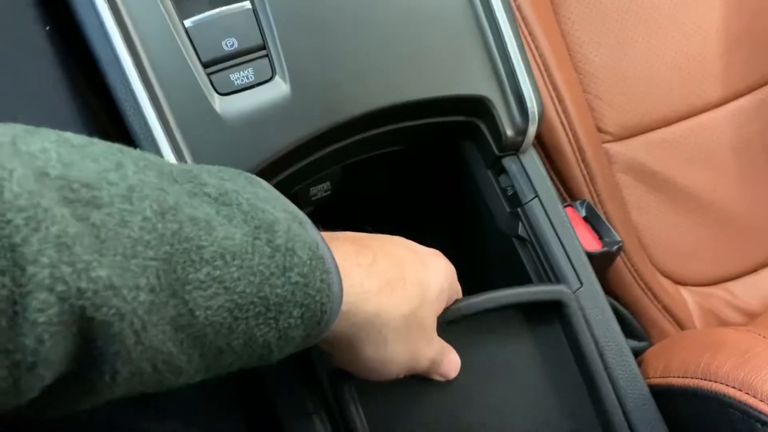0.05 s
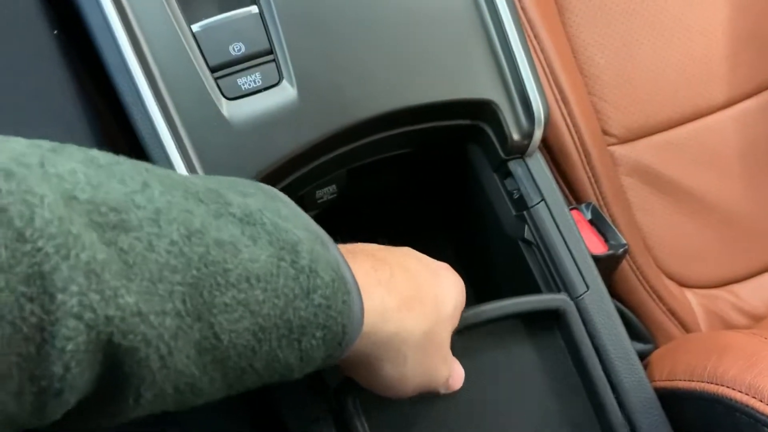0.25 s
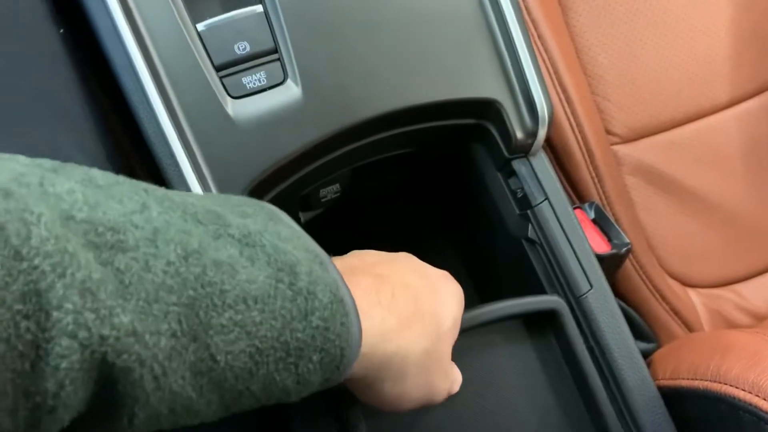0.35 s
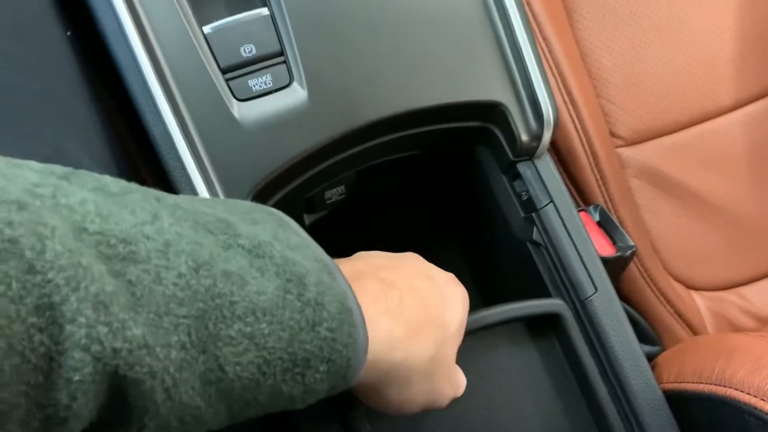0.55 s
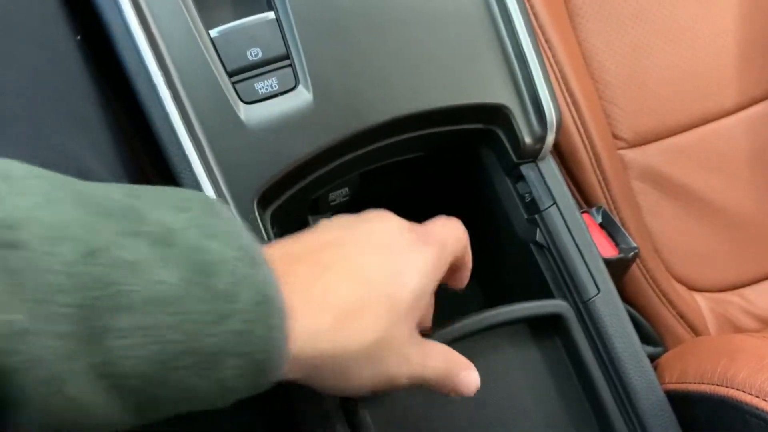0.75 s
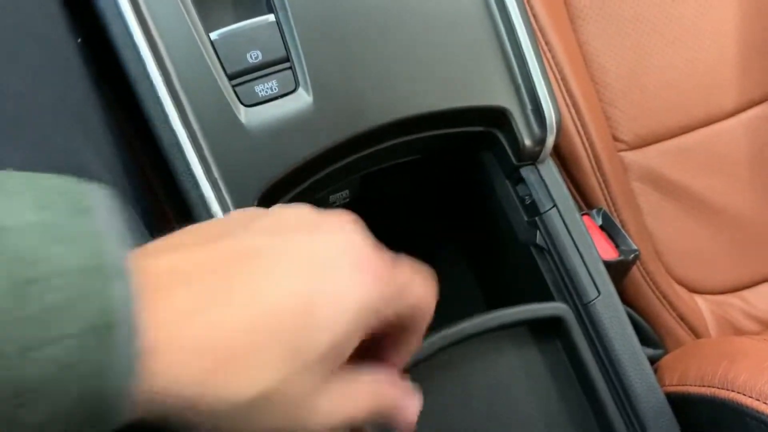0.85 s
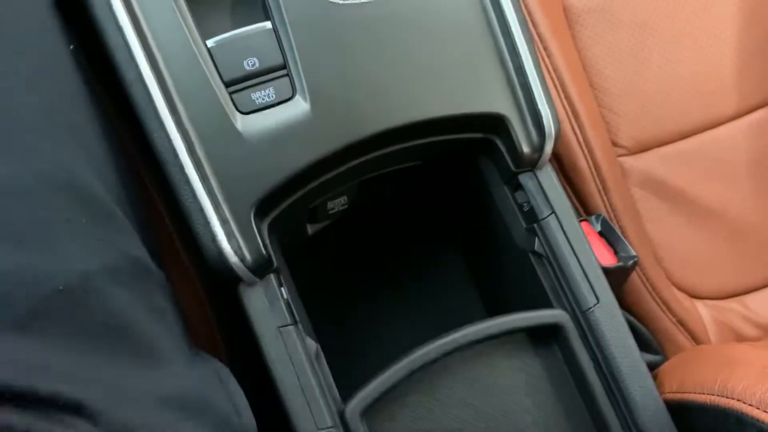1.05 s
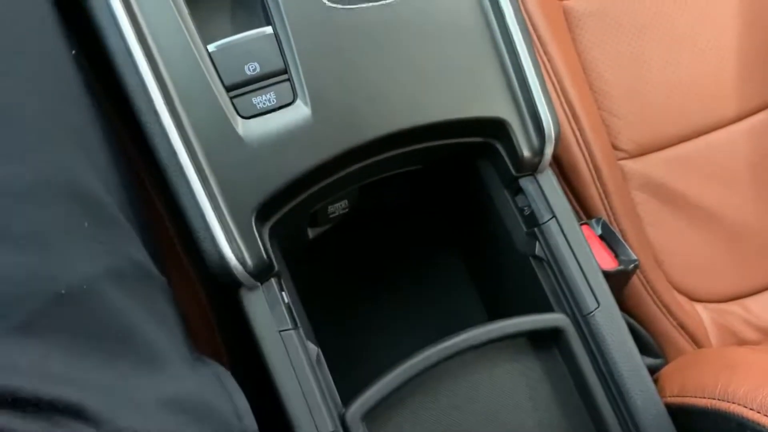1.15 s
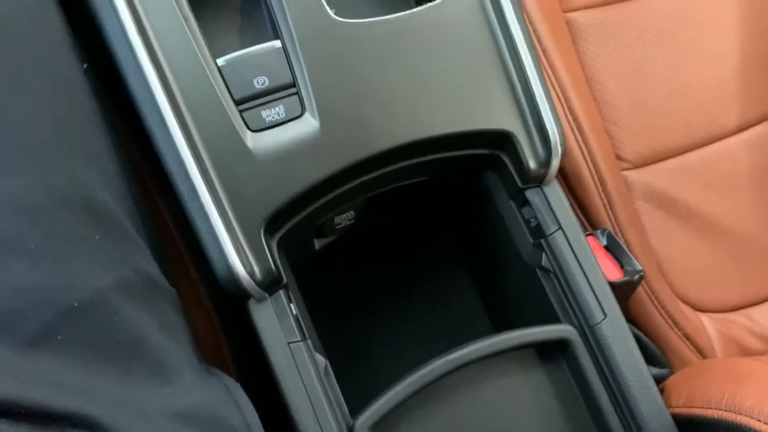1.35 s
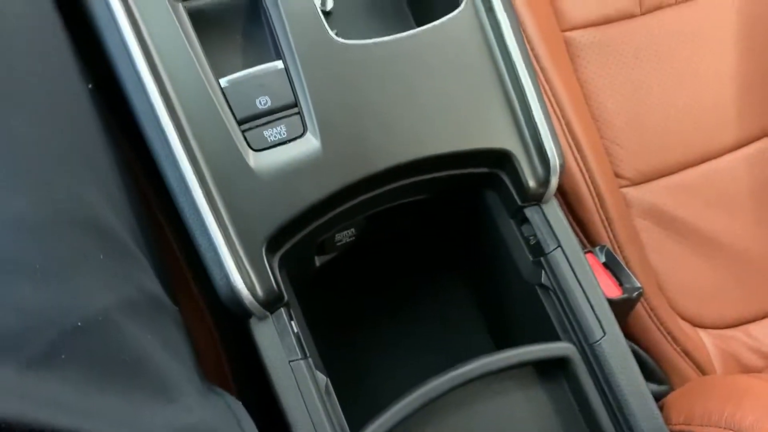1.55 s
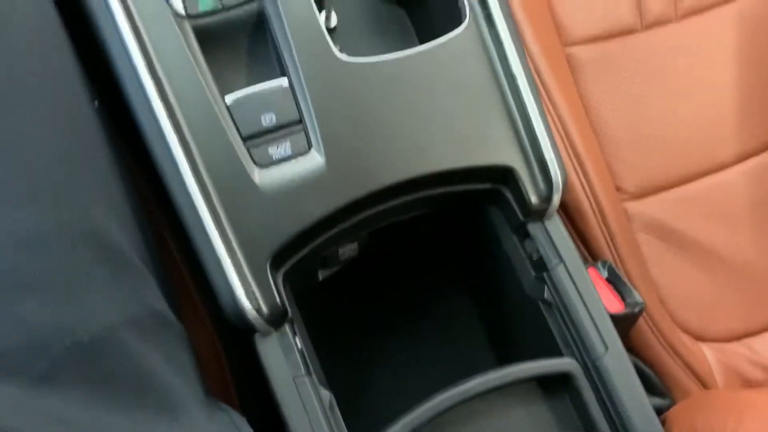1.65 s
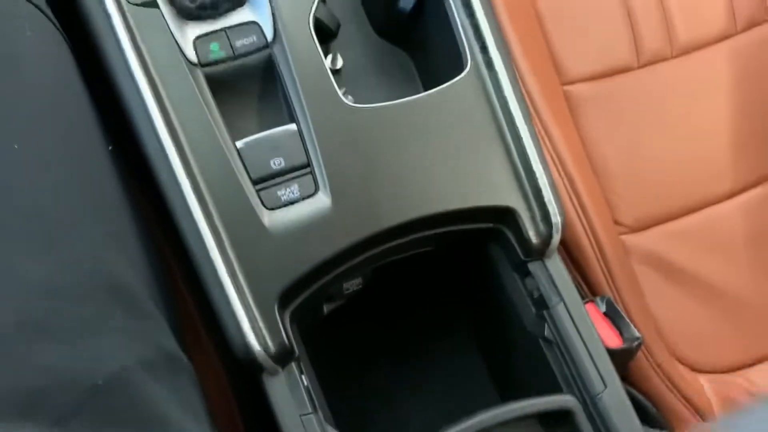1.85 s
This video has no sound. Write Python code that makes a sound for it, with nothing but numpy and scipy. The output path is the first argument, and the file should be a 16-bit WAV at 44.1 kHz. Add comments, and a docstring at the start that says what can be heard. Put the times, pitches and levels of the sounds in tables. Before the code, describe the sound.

A plastic lid clunks twice inside a car, followed by a soft rustle of fleece.

```python
"""A light knock, then two hard clunks: the sliding plastic lid of a car's centre console is shoved back against
its stop. Each blow rings the lid and rattles the panels round it, the padded cabin rings on briefly, and a
short low boom follows. Then a fleece sleeve draws away, hissing and rubbing over trim and seat, with a few soft
handling bumps. A faint cabin rumble lies under it all."""
import sys
import numpy as np
from scipy import signal
from scipy.fft import rfft, irfft
from scipy.io import wavfile
from scipy.ndimage import uniform_filter1d

SR = 44100
rng = np.random.default_rng(int(sys.argv[2]) if len(sys.argv) > 2 else 0)


def output_pcm(signal):
    """Save a mono or channel-first signal as 16-bit PCM at the path in sys.argv[1].

    Samples are clipped to [-1, 1] before scaling.
    """
    pcm = np.clip(np.atleast_2d(signal).T, -1, 1) * 32767
    wavfile.write(sys.argv[1], SR, np.round(pcm).astype(np.int16))


N = 83790
T = np.arange(N) / SR

# The lid hits its guides and stop:
# start_s, thump_db, knock_db, click_db, place (0 middle to 1 edge), cutoff_hz
LID_BLOWS = [(0.0966, -14.5, -20.5, -28.5, .9, 4700), (0.166, -43, -48.5, -64, 1, 1500),
             (0.1998, -27.5, -30.5, -40, 0.53, 9000), (0.2253, -10.5, -19, -23, .1, 14980),
             (0.2352, 2, 0.5, 0.5, 0.13, 10980), (0.459, -37, -48, -39.5, 0.89, 9000),
             (0.4889, -2.5, -0.5, -4, 0.94, 11900), (0.4991, -22.5, -13, -18, 0.78, 8000),
             (0.528, -29, -57, -37.5, 0.75, 15000)]
THUMP_HZ, KNOCK_HZ, CLICK_HZ = 300, 1000, 5000
# Dull thuds of buffer and console: peak_s, level_db, pitch_hz, width_s
BUFFER_THUDS = [(0.059, -40.5, 292, 0.0033), (0.074, -35, 245, 0.0063), (0.102, -25.5, 400, .0018),
                (0.2084, -17.5, 290.5, 0.0023), (0.2124, -16, 280, 0.0036), (0.2289, -15.5, 291, .003),
                (0.2458, -9.5, 280.5, .004), (0.2587, -9.5, 241.4, 0.0055), (0.294, -30, 203.8, .012),
                (0.324, -36, 82, 0.0083), (0.478, -40.5, 326, .008)]
# Ring of lid and bin: pitch_hz, middle_hit_db, edge_hit_db, t60_s
LID_MODES = [(203, -15.5, -14, 0.15), (236.2, -14.5, -19.5, 0.14), (301.3, -4, -4.5, .085),
             (381.4, -20, -18, 0.17), (497.4, -10, -10.5, .06), (580, -22.5, -14, .055),
             (775, -18.5, -10, .05), (864, -18.5, -11.5, .055), (976, 0, -14, .024),
             (1160, -30, -18.5, 0.065), (1263, -27.5, -24, .085), (1440, -24, -19.5, .03),
             (1788, -32, -25, 0.097), (2690, -38, -37.5, .09)]
# Clustered panel resonances: pitch_hz, width_hz, level_db
PANEL_BANDS = [(1000, 300, -19), (1432, 300, -20.5), (2028, 520, -18.5), (2790, 200, -34),
               (3235, 220, -23.5), (3493, 550, -26.5), (4407, 610, -23), (5370, 420, -25)]
# Scrapes along the rails: peak_s, level_db, width_s
RAIL_SCRAPES = [(0.103, -70.5, 0.034), (0.209, -65.5, 0.014), (0.228, -43, .003), (0.3, -63.5, .006),
                (0.483, -63.5, .012), (0.543, -54.5, 0.0081), (0.571, -67, 0.021), (0.673, -69.5, 0.013)]
# Quick cloth strokes: peak_s, level_db, width_s, pitch_hz, width_hz
CLOTH_RASPS = [(0.983, -73, 0.043, 8500, 6000), (1.053, -73, 0.033, 5600, 2500),
               (1.23, -51.5, 0.0049, 1546, 897), (1.355, -67, 0.021, 4380, 2007),
               (1.501, -70, 0.017, 3300, 900), (1.693, -66.5, 0.0065, 4090, 902)]
# Soft handling bumps: peak_s, level_db, rise_s, treble_db, bass_db
HAND_BUMPS = [(0.679, -64.5, 0.0063, -2, 15.5), (1.117, -49.5, 0.0025, 2, 11),
              (1.228, -42, 0.0045, -1.5, -6), (1.322, -56, 0.0019, -3, 10),
              (1.483, -56.5, 0.0014, 4.5, -7.5), (1.506, -48, 0.00079, -12, -4),
              (1.658, -58, 0.0063, 2, -13), (1.722, -42.5, 0.0079, -24, -15),
              (1.7523, -40, 0.0014, -6.5, -17)]

# Fader rides for cabin rumble, sleeve hiss and sleeve rub: time_s, level_db
RUMBLE_RIDE = [(0, -54.5), (0.4, -57), (0.7, -64.5), (0.9, -71), (1.08, -69.5), (1.35, -63), (1.55, -64),
               (1.9, -62)]
HISS_RIDE = [(0.62, -89), (0.93, -82), (0.965, -70), (1.075, -65), (1.14, -73.5), (1.23, -72.5), (1.3, -82),
             (1.33, -65.5), (1.365, -69), (1.4, -75), (1.46, -84.5), (1.51, -75), (1.59, -90),
             (1.695, -65.5), (1.74, -77.5), (1.82, -82), (1.85, -68), (1.9, -76.5)]
RUB_RIDE = [(0.46, -91.5), (0.6, -73.5), (0.76, -74.5), (0.9, -86), (1.01, -68.5), (1.08, -61.5),
            (1.18, -66.5), (1.3, -70), (1.34, -58), (1.4, -69.5), (1.47, -77), (1.53, -73), (1.59, -73),
            (1.7, -57), (1.78, -60), (1.9, -66)]

# Tone curves of the noise layers: frequency_hz, density_db
RUMBLE_EQ = [(20, -19.5), (45, -4), (70, -1), (110, -5), (170, -14.5), (290, -13.5), (500, -20.5),
             (1000, -40.5)]  # low cabin rumble
AIR_EQ = [(100, -1.5), (400, -9), (1000, -14.5), (3000, -20.5), (8000, -20.5), (16000, -22)]  # faint air
CRACK_EQ = [(1000, -13.5), (3000, -4.5), (5500, -5.5), (7500, -13.5), (11000, -23), (16000, -31.5)]  # bright crack of the trim
CABIN_EQ = [(30, -7), (60, 0), (100, 4), (150, -6), (280, -6.5), (450, -22.5), (900, -37), (2000, -52.5)]  # dark cabin tail
SCATTER_EQ = [(400, -1.5), (900, 3), (1400, -5.5), (2000, -7), (2500, -13.5)]  # midrange reflections off glass and trim
SHEEN_EQ = [(2200, -1), (3300, 1.5), (5400, -2), (6800, -12), (10000, -14), (16000, -23.5)]  # their treble
SCRAPE_EQ = [(1000, -2), (3000, -3.5), (5000, -3), (7000, -12), (16000, -19)]  # lid on rails
HISS_EQ = [(1200, -6.5), (1600, -2), (2440, -3), (4120, -1), (5540, -4.5), (7170, -11), (8570, -11),
           (12500, -17.5), (16000, -17.5)]  # fleece hiss
RUB_EQ = [(190, -14.5), (300, 5), (400, 0.5), (700, -4), (1020, -3), (1300, -9.5), (1800, -15.5),
          (3000, -25.5)]  # dull fleece rub
BUMP_EQ = [(150, -23), (300, 0.5), (500, -4), (750, -5), (1030, 2.5), (1300, -18.5), (1900, -14),
           (2600, -31), (5000, -39)]  # body of a handling bump
BOOM_DELAY_S = 0.031  # the bass blooms this long after a blow or bump


def from_db(db):
    return 10 ** (np.asarray(db) / 20)


def gain_at(eq, hz):
    """Gain of a tone curve, read on a log-frequency axis."""
    points_hz, db = np.transpose(eq)
    return from_db(np.interp(np.log(hz + 1e-9), np.log(points_hz), db))


def fader(ride):
    """A fader ride as a gain in time."""
    return from_db(np.interp(T, *np.transpose(ride)))


def rms_one(x):
    return x / np.sqrt(np.mean(x ** 2) + 1e-20)


def noise(eq):
    """Noise shaped by a tone curve, rolled off beyond its ends; rms 1."""
    hz = np.arange(N // 2 + 1) * SR / N + 1e-3
    skirts = np.minimum(1, hz / eq[0][0]) ** 2 * np.minimum(1, eq[-1][0] / hz) ** 2
    return rms_one(irfft(rfft(rng.standard_normal(N)) * gain_at(eq, hz) * skirts, N))


def resonance(hz, width_hz):
    """Many close modes round one pitch, evened in level; rms 1."""
    detune = (np.arange(N) * SR / N - hz) / (width_hz / 2)
    band = np.fft.ifft(np.fft.fft(rng.standard_normal(N)) / (1 + detune ** 2) ** 2)
    envelope = np.sqrt(uniform_filter1d(abs(band) ** 2, size=350) + 1e-20)
    return rms_one(band.real / envelope)


def fade(age, t60_s):
    """Full until age zero, then 60 dB down in t60_s."""
    return np.exp(-np.log(1000) * np.maximum(age, 0) / t60_s)


def hit_shape(rise_s, t60_s, hold_s=0):
    """A smooth attack and a decay that sets in at hold_s."""
    return (1 - np.exp(-(T / rise_s) ** 2)) * fade(T - hold_s, t60_s)


def bell(peak_s, width_s):
    """A bell-shaped swell; width_s is its standard deviation."""
    return np.exp(-((T - peak_s) / width_s) ** 2 / 2)


def thud(peak_s, hz, width_s):
    """A brief tone under a bell-shaped swell."""
    return bell(peak_s, width_s) * np.cos(2 * np.pi * hz * (T - peak_s))


def strike(response, hz, middle_db=0, edge_db=0):
    """Play a response at every blow, as hard as its force and place drive hz, dulled by each blow's own low-
    pass."""
    out = np.zeros(N)
    for start_s, thump_db, knock_db, click_db, place, cutoff_hz in LID_BLOWS:
        start = int(start_s * SR)
        lowpass = signal.butter(4, cutoff_hz, fs=SR, output="sos")
        dulled = signal.sosfilt(lowpass, response[:N - start] + 1e-18)
        force = gain_at([(THUMP_HZ, thump_db), (KNOCK_HZ, knock_db), (CLICK_HZ, click_db)], hz)
        coupling = from_db(np.interp(place, [0, 1], [middle_db, edge_db]))
        out[start:] += force * coupling * dulled
    return out


def room_tone():
    """The quiet of a parked car: low rumble and a trace of air."""
    return fader(RUMBLE_RIDE) * noise(RUMBLE_EQ) + from_db(-76.5) * noise(AIR_EQ)


def buffer_thuds():
    """The lid thuds softly on its rubber buffer, and the console thuds under it."""
    return sum(from_db(db) * thud(peak_s, hz, width_s) for peak_s, db, hz, width_s in BUFFER_THUDS)


def lid_ring():
    """Every blow rings the lid's modes; the low ones take longer to build up."""
    build_cycles = 0.49
    out = np.zeros(N)
    for k, (hz, middle_db, edge_db, t60_s) in enumerate(LID_MODES):
        polarity = (-1) ** (k + 1)
        ring = polarity * hit_shape(build_cycles / hz, t60_s) * np.sin(2 * np.pi * hz * T)
        out += strike(ring, hz, middle_db, edge_db)
    return out


def panel_rattle():
    """The trim rattles and cracks for a few milliseconds at each blow."""
    burst = hit_shape(rise_s=0.0017, t60_s=0.022, hold_s=0.0032)
    rattle = sum(from_db(db) * resonance(hz, width_hz) * strike(burst, hz)
                 for hz, width_hz, db in PANEL_BANDS)
    crack = from_db(-22.5) * noise(CRACK_EQ) * strike(burst, CLICK_HZ)
    return rattle + crack


def tail_and_late_boom():
    """The cabin answers each blow with diffuse reflections and the ring of its air; a late low boom follows
    each blow."""
    bloom_s, reflect_s, air_hz = 0.01, 0.0061, 99.76
    tail = from_db(-34) * noise(CABIN_EQ) * strike(hit_shape(bloom_s, t60_s=0.44), THUMP_HZ)
    scatter = from_db(-23.5) * noise(SCATTER_EQ) * strike(hit_shape(reflect_s, t60_s=0.1), KNOCK_HZ)
    sheen = from_db(-33) * noise(SHEEN_EQ) * strike(hit_shape(reflect_s, t60_s=0.095), CLICK_HZ)
    boom = from_db(-26) * thud(BOOM_DELAY_S, hz=85, width_s=0.0037)
    air_ring = from_db(-36.5) * hit_shape(bloom_s, t60_s=0.45) * np.sin(2 * np.pi * air_hz * T)
    return tail + scatter + sheen + strike(boom + air_ring, THUMP_HZ)


def rail_scrapes():
    """The moving lid scrapes its rails in short, faint bursts."""
    swells = sum(from_db(db) * bell(peak_s, width_s) for peak_s, db, width_s in RAIL_SCRAPES)
    return swells * noise(SCRAPE_EQ)


def sleeve():
    """Fleece slides over trim and seat, fibres catching unevenly; quick strokes add a pitched rasp."""
    grain_db, grain_s = 1.5, 0.0054
    catching = rms_one(uniform_filter1d(rng.standard_normal(N), int(grain_s * SR)))
    rasps = sum(from_db(db) * bell(peak_s, width_s) * resonance(hz, width_hz)
                for peak_s, db, width_s, hz, width_hz in CLOTH_RASPS)
    hiss = fader(HISS_RIDE) * noise(HISS_EQ)
    rub = fader(RUB_RIDE) * noise(RUB_EQ)
    return from_db(grain_db * catching) * (hiss + rub + rasps)


def handling_bumps():
    """Soft contacts swell and die quickly, with a brush of treble and a late bass."""
    bass_width_s = 0.017
    body, brush, bass = noise(BUMP_EQ), noise(HISS_EQ), noise(RUMBLE_EQ)
    out = np.zeros(N)
    for peak_s, db, rise_s, treble_db, bass_db in HAND_BUMPS:
        age = T - peak_s
        attack = np.exp(np.minimum(age, 0) / rise_s)
        decay = fade(age - rise_s / 2, t60_s=0.06)
        tail = from_db(-13) * fade(age, t60_s=0.22)
        contact = attack * np.hypot(decay, tail) * (body + from_db(treble_db - 17.5) * brush)
        bloom = np.exp(-((age - BOOM_DELAY_S) / bass_width_s) ** 2)
        out += from_db(db) * (contact + from_db(bass_db - 13) * bloom * bass)
    return out


def scene():
    """Lid, cabin and sleeve over the room tone, mixed in mono."""
    bed = room_tone()
    lid = buffer_thuds() + lid_ring() + panel_rattle() + rail_scrapes()
    return (bed + lid + tail_and_late_boom() + handling_bumps() + sleeve())[None]


def record(dry):
    """Roll off the deepest bass, round the highest peaks and cut the very top."""
    low_cut_hz, ceiling, stopband_hz = 38, 0.95, 16700
    trimmed = signal.sosfilt(signal.butter(2, low_cut_hz, "high", fs=SR, output="sos"), dry)
    rounded = trimmed / (1 + (trimmed / ceiling) ** 6) ** (1 / 6)
    return signal.sosfiltfilt(signal.cheby2(14, 50, stopband_hz, fs=SR, output="sos"), rounded)


dry = scene()
out = record(dry)
output_pcm(out)
```